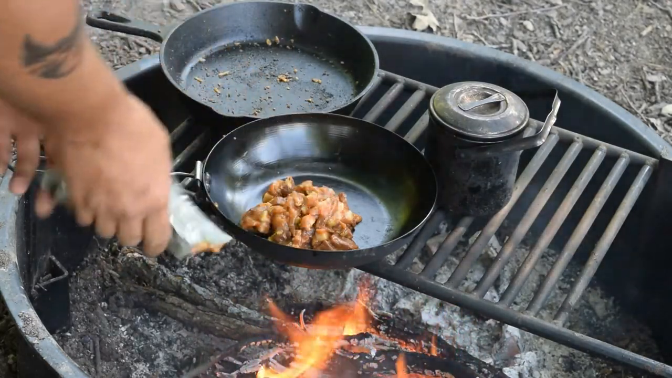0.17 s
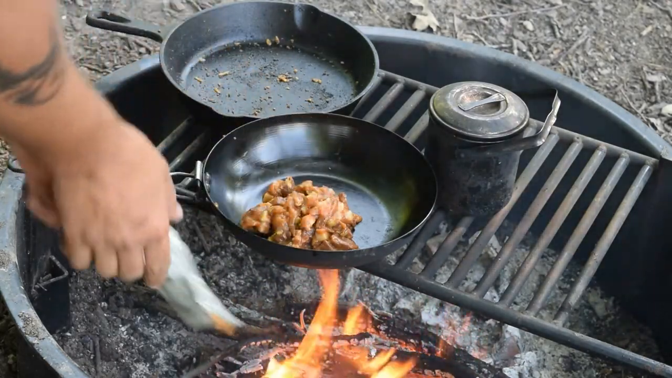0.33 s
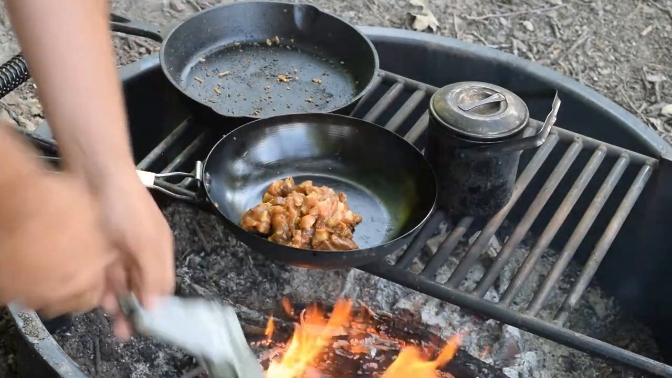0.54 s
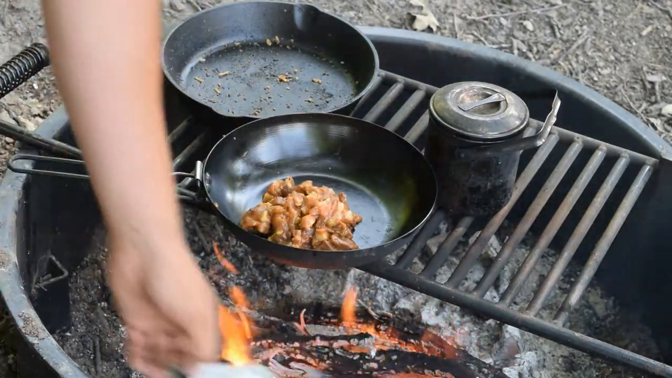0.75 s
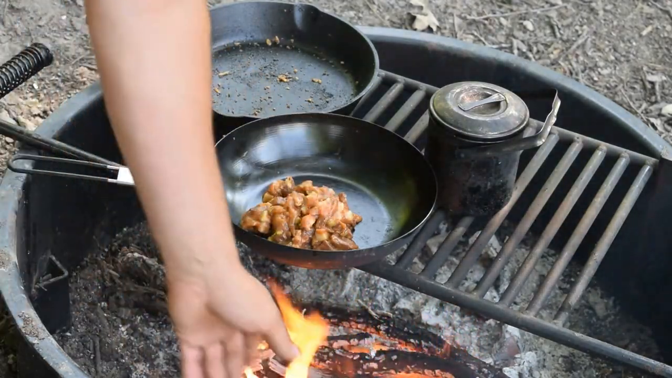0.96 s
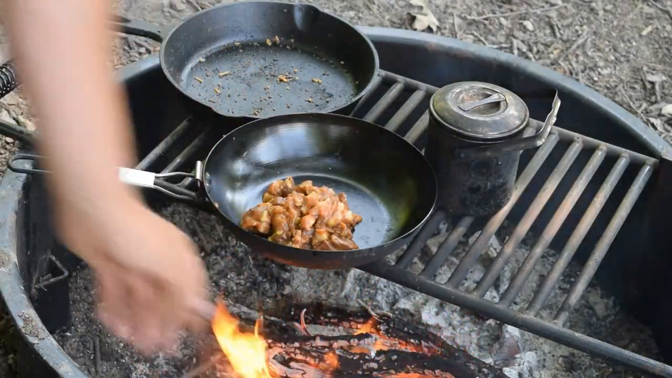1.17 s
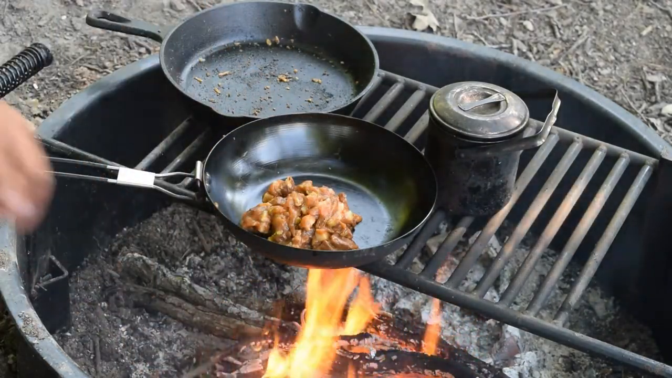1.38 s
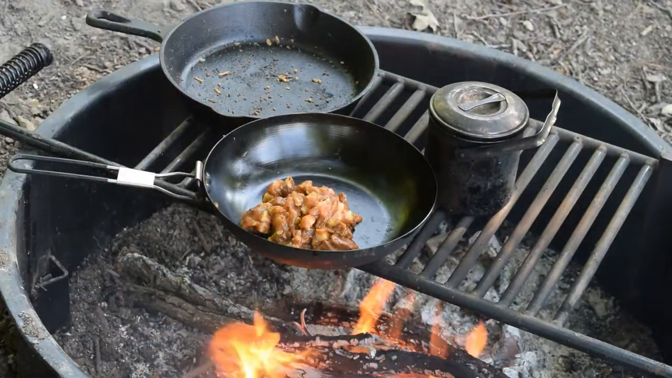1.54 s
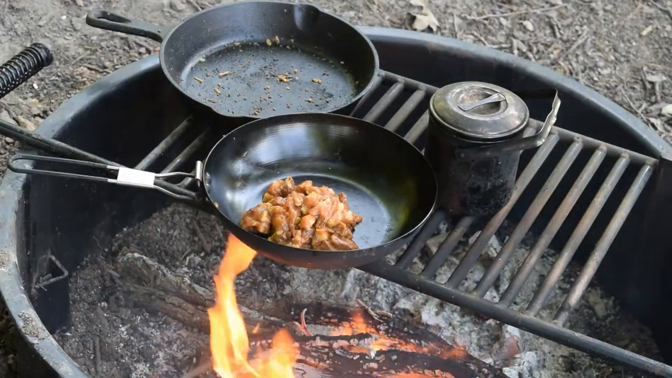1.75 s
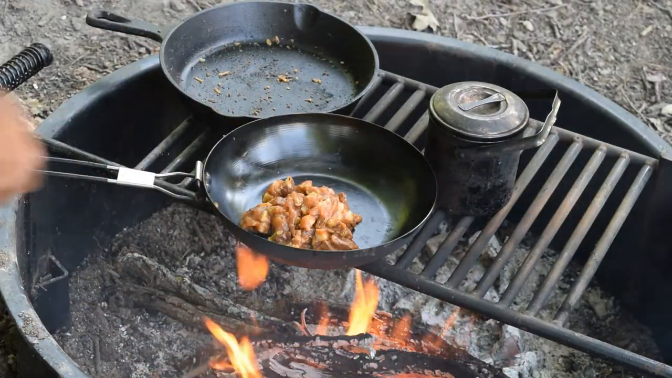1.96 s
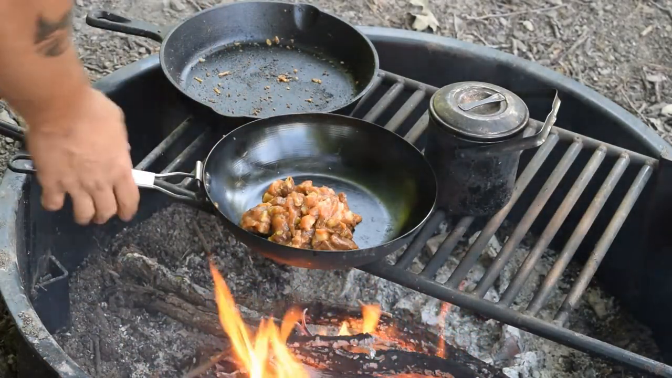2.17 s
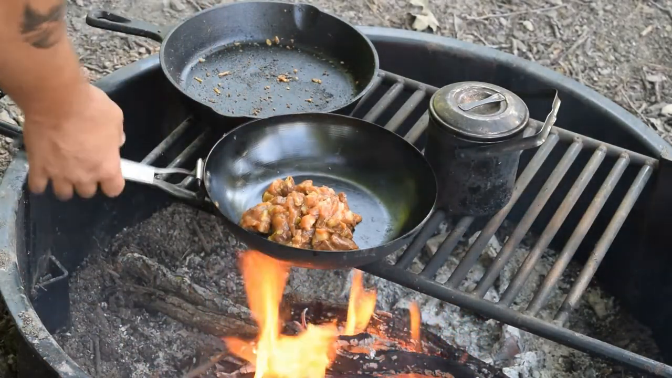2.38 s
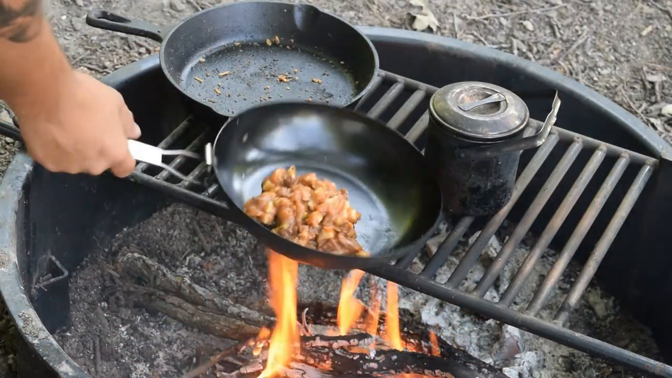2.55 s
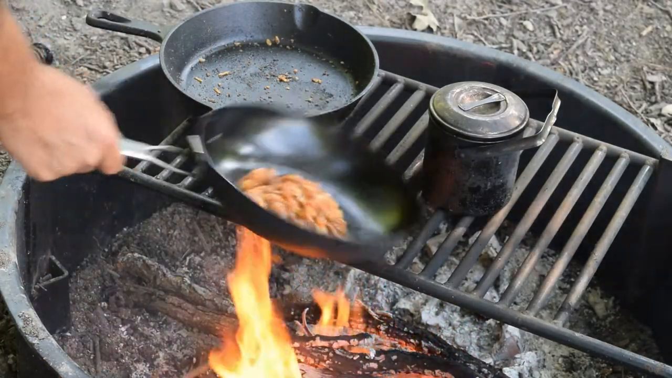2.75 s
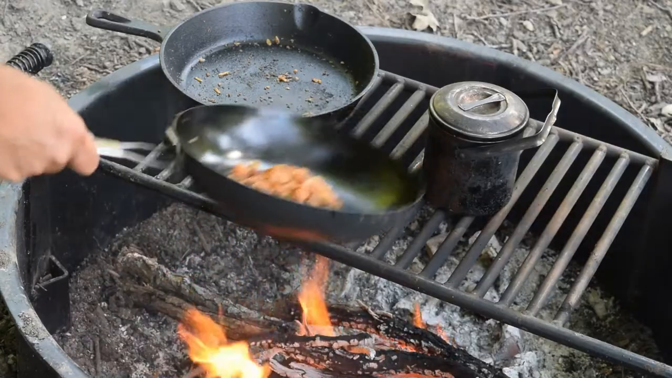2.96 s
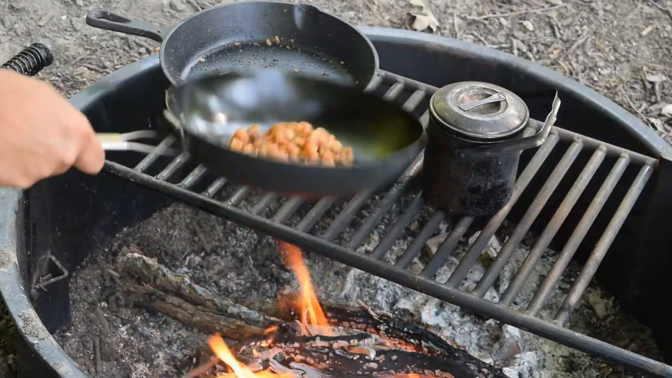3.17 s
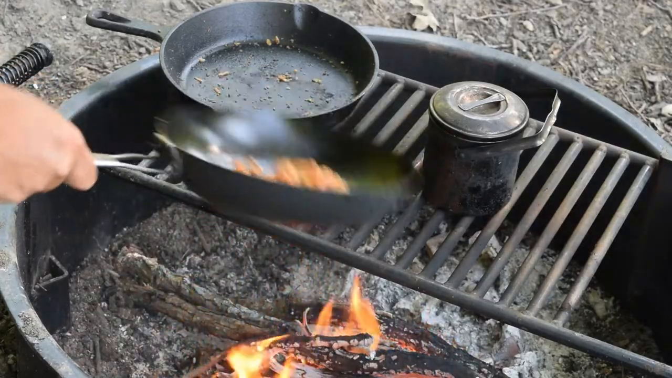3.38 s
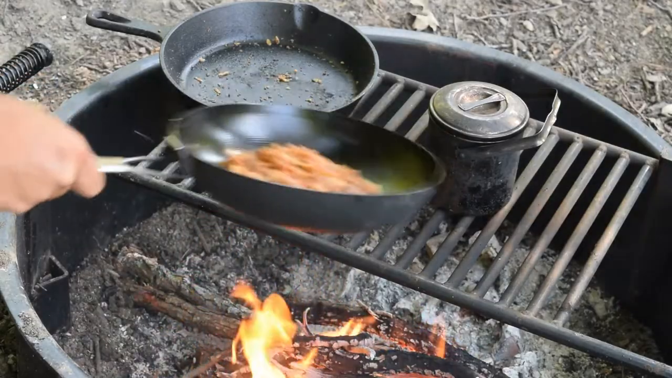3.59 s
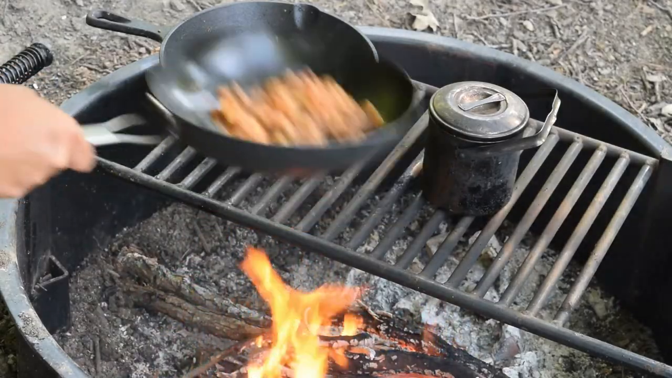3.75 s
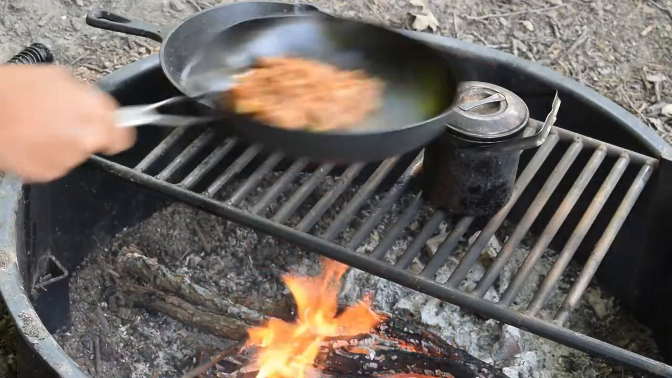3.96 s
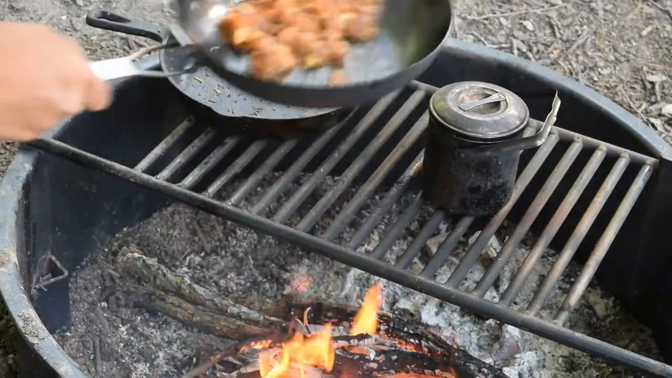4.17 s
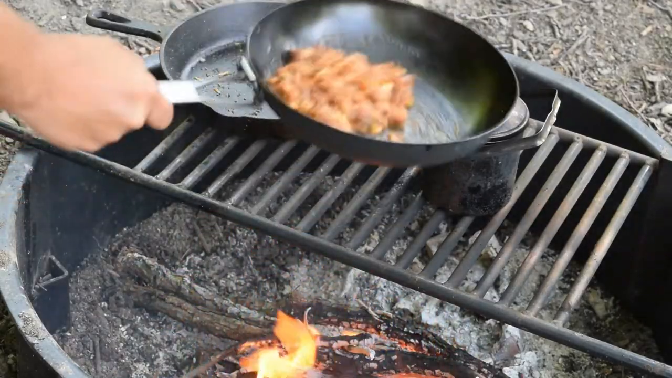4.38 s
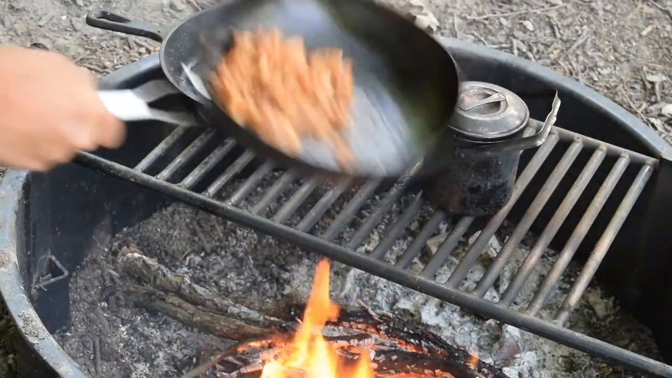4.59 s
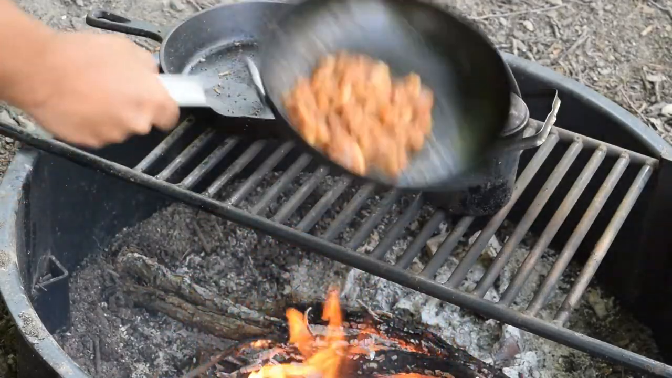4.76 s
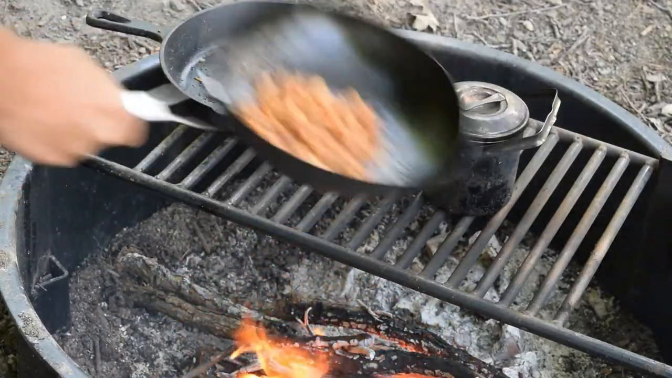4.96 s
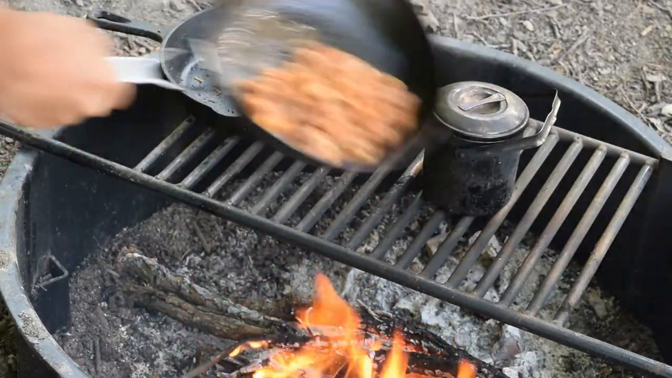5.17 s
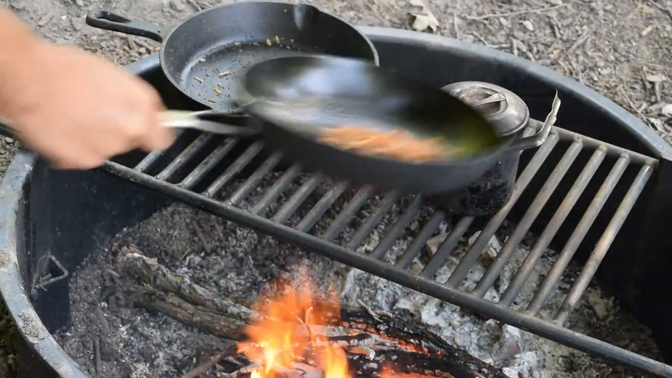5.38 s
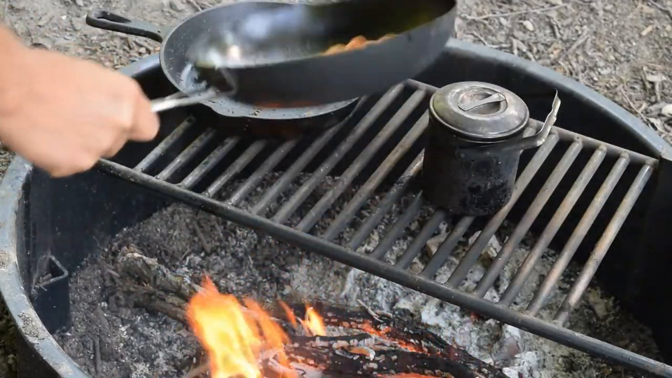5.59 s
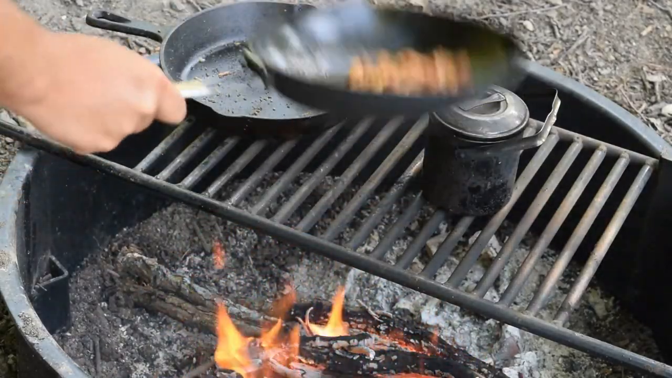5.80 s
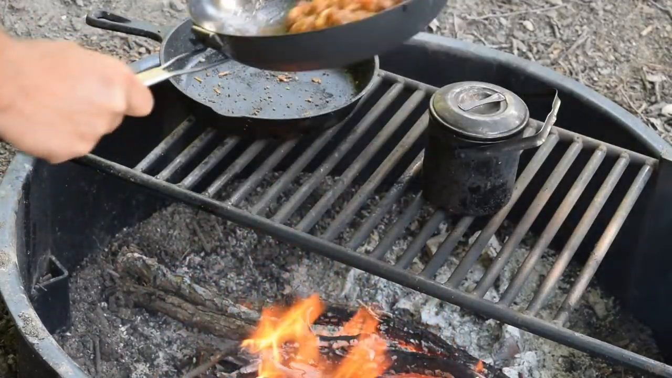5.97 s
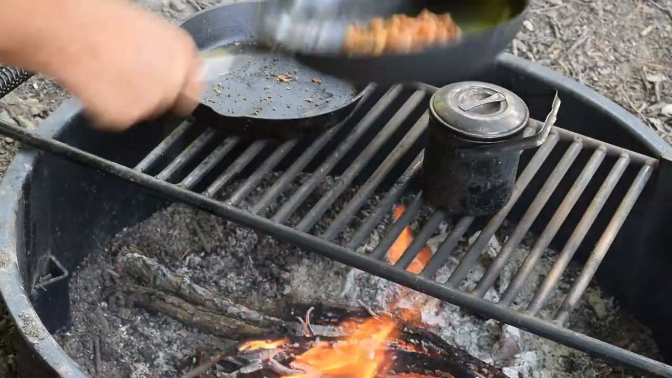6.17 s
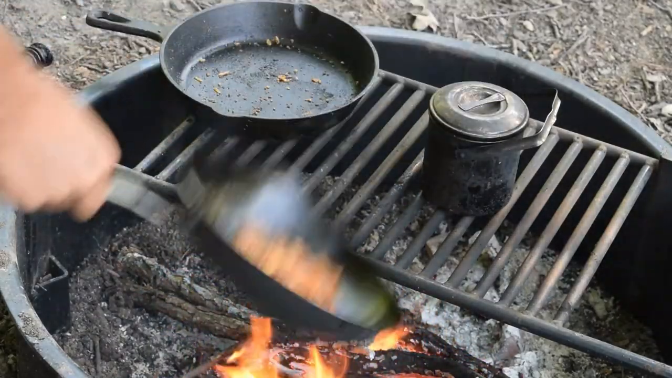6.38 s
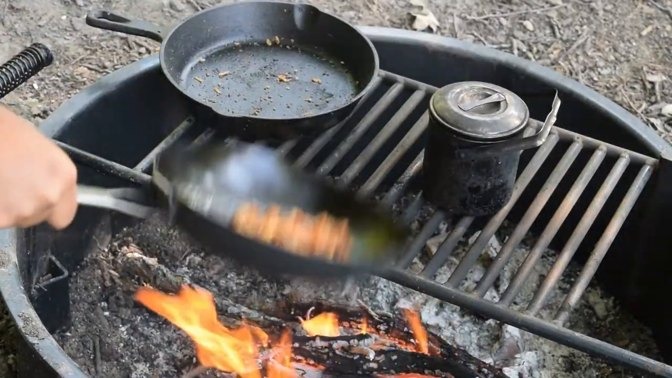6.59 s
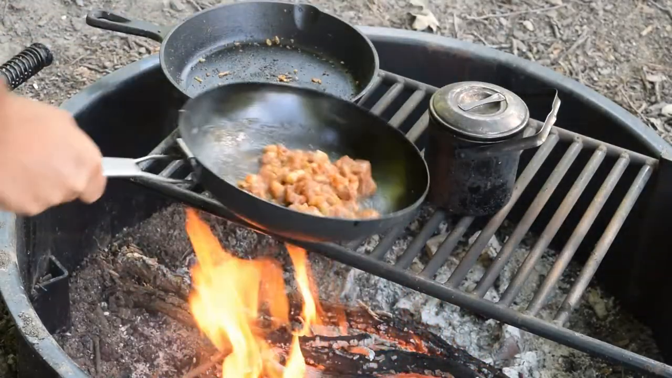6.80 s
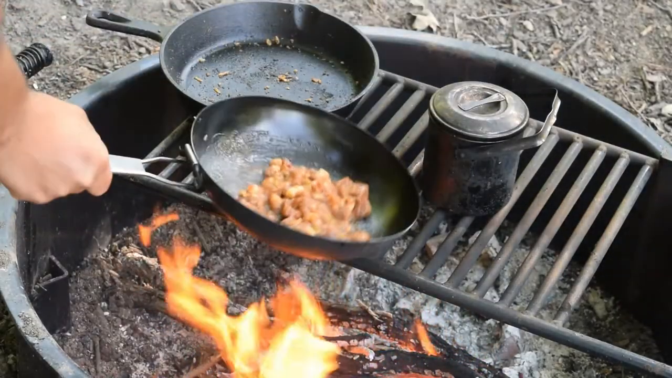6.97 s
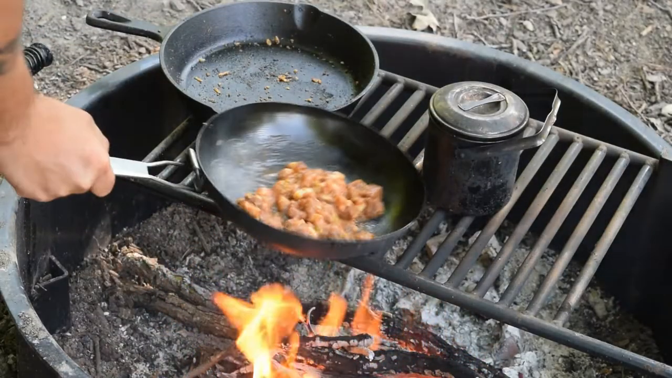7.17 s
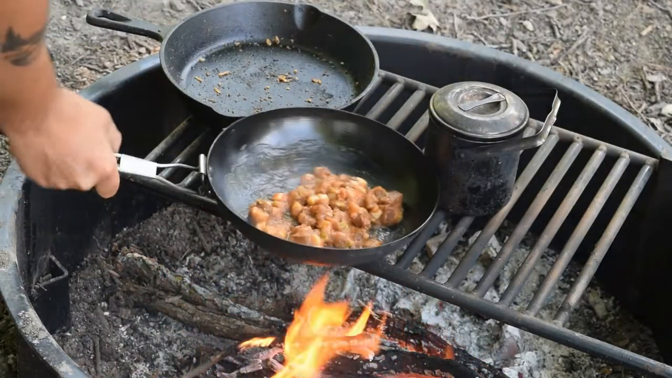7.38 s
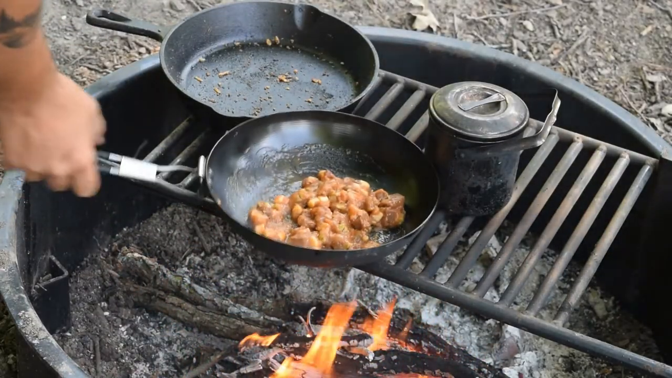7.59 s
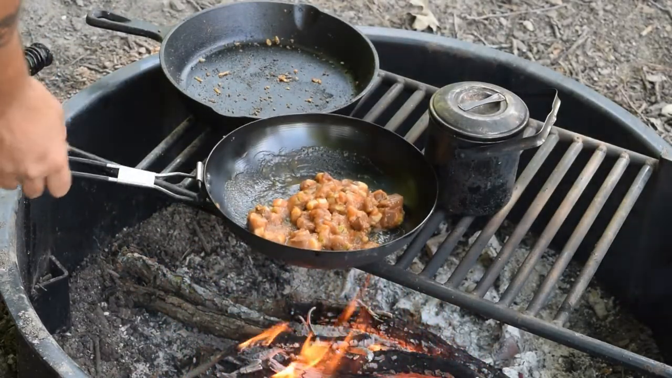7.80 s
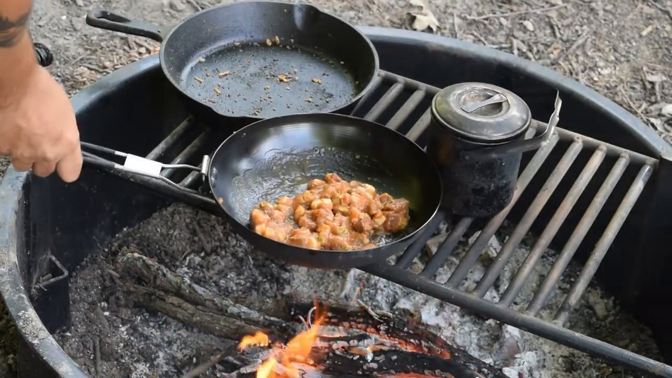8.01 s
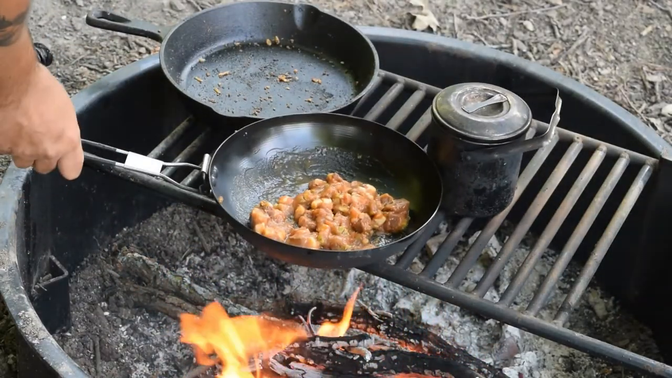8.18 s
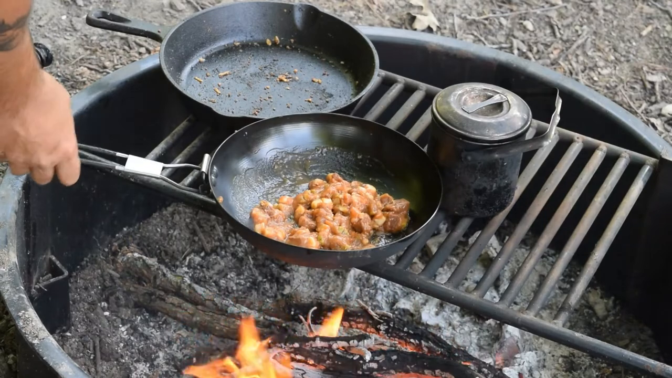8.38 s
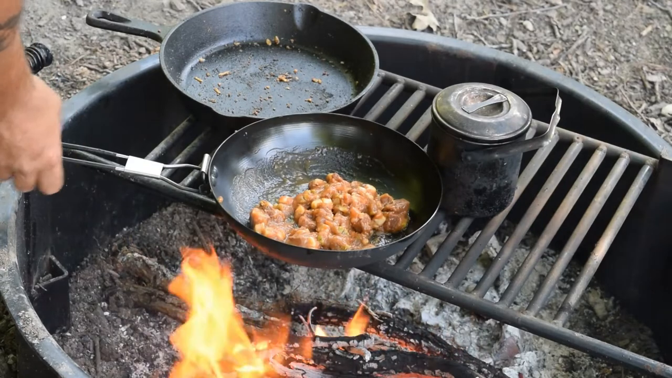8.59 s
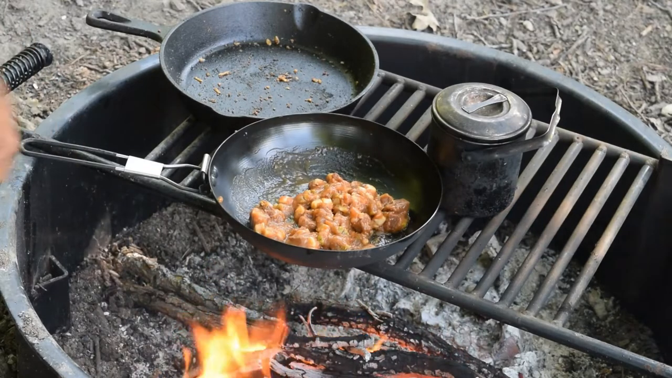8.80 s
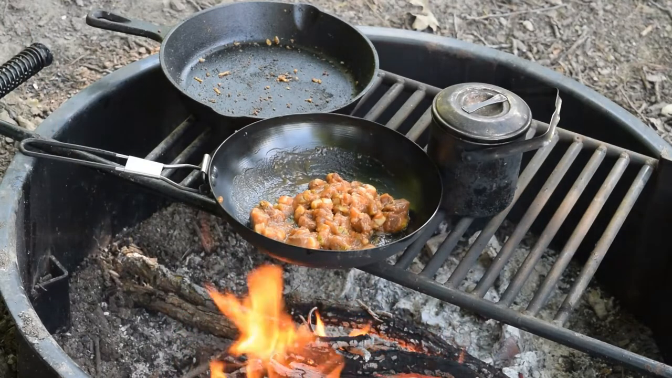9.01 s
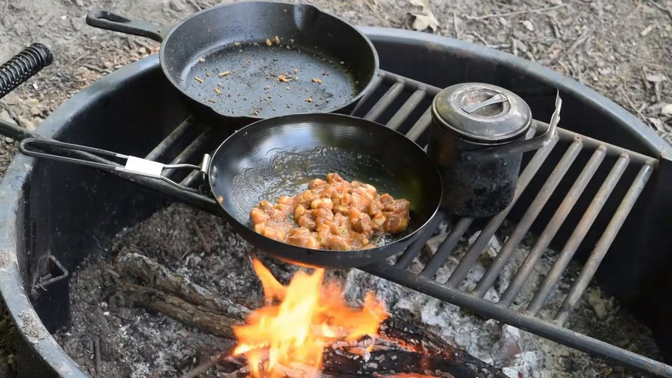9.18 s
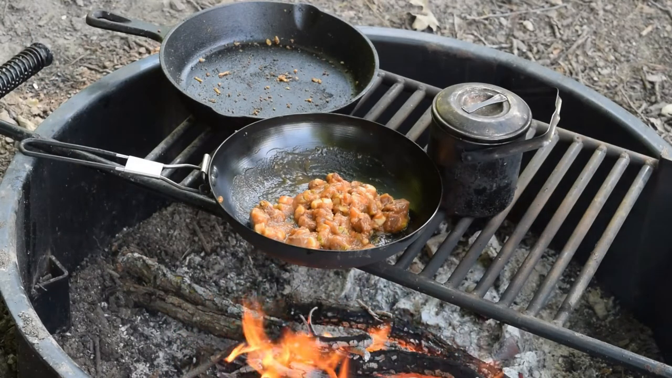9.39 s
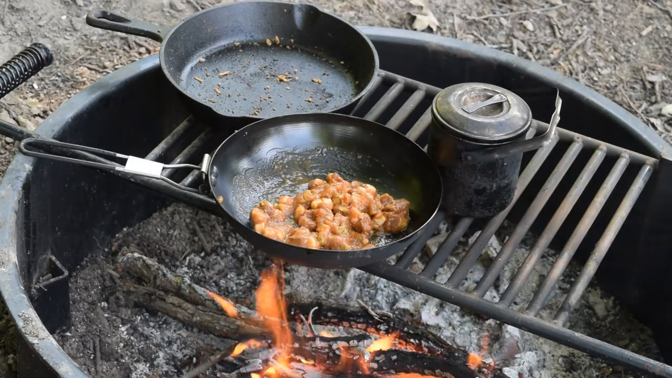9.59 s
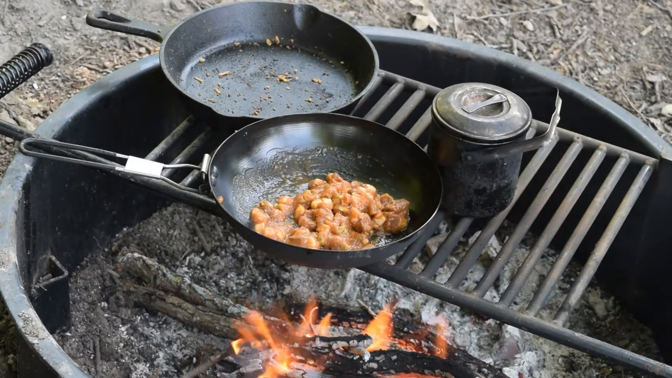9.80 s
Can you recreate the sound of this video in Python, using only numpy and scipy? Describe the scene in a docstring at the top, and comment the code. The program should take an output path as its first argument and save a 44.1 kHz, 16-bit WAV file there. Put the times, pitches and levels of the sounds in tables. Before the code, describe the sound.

A steel pan lifts from a fire grate, wet meat slides and sizzles, the pan clanks back down, and sharp fire pops continue.

```python
"""A faint sizzle of meat in a steel pan over a campfire, in open air, with small birds chipping far off.
The pan is lifted off the grate and swirled: steam bubbles hiss up as the meat slides onto hot metal.
Then it is set down with a clank, thuds and ringing modes of pan and grate, and rocks to rest.
Pockets of steam keep popping in wood and fat; low rumble, soft hiss and a far hum lie beneath.
Two close microphone ports take it all from nearly straight ahead."""
import sys
import numpy as np
from scipy import signal
from scipy.fft import rfft, irfft
from scipy.io import wavfile
from scipy.ndimage import uniform_filter1d

SR = 44100
rng = np.random.default_rng(int(sys.argv[2]) if len(sys.argv) > 2 else 0)


def wrap_up_sound(samples):
    """Save the sound to the file named by the first command line argument, as 16-bit audio."""
    columns = np.atleast_2d(samples).T
    # keep every value between -1 and 1, then stretch to whole-number steps
    tamed = np.clip(columns, -1, 1)
    steps = np.round(tamed * 32767).astype(np.int16)
    wavfile.write(sys.argv[1], SR, steps)


N = 434385
TIME, BINS = np.arange(N) / SR, np.fft.rfftfreq(N, 1 / SR)  # s, Hz
TAPS = 2048  # samples in a short pulse
TAP_HZ = np.fft.rfftfreq(TAPS, 1 / SR)

# colour of the open air and flames: frequency_hz, relative_level_db
AIR_COLOUR = [(12, -50), (20, -5), (60, -2.5), (113, -3.5), (138, -7.5), (328, -13.5), (367, -13),
              (459, -13), (590, -15), (642, -15), (2990, -22.5), (4540, -23.5), (10200, -30.5),
              (13500, -38.5), (16000, -35)]
AIR_DB, HUM_DB = -54.5, -71  # mean levels of the air and of the far low hum
# phrases of a far bird's chips: first_crest_s, last_crest_s, crest_hz, rising_share (0-1 of each note)
BIRD_PHRASES = [(0.05, .438, 4070, .4), (4.933, 5.432, 4700, .2)]
CHIP_GAP_S = 0.128  # approximate: a phrase holds a whole number of gaps
# thin far whistles: start_s, length_s, pitch_hz
BIRD_WHISTLES = [(0.327, 0.15, 4900), (8.126, .14, 6100), (8.936, 0.12, 4600), (9.66, .16, 4800)]

# the loudest pops of wood and fat: start_s, level_db, ring_hz, splintering (0-1)
LOUD_POPS = [(0.4041, -31, 14000, 0.05), (1.0331, -40, 2430, 0.6), (1.866, -38, 13500, 0.13),
             (2.6013, -43, 2870, 0.47), (2.752, -40, 7100, 0.23), (3.281, -41, 8550, .35),
             (3.295, -33.5, 8800, 0.18), (4.63, -36, 13500, 0.1), (4.664, -35.5, 1200, .2),
             (4.8145, -39, 4600, 0.19), (5.238, -34, 2900, 0.11), (5.537, -35, 7850, 0.18),
             (5.627, -39, 13000, 0.18), (5.991, -33.5, 4500, 0.13), (6.288, -44, 7700, 0.66),
             (6.334, -39, 7400, 0.27), (6.4017, -32.5, 3680, 0.19), (7.0982, -24.5, 4500, 0.06),
             (7.5427, -33, 8550, .1), (8.5133, -29, 3800, 0.09), (8.7365, -40, 3450, 0.24),
             (9.2573, -13.5, 300, 0.15), (9.559, -30.5, 7450, 0.09)]
# shared colour of pops and ember ticks: frequency_hz, relative_level_db
POP_COLOUR = [(60, 0), (250, -2), (600, 2), (2000, 1), (3300, 3), (4400, -1), (5300, -1), (7200, -5),
              (8400, -0.5), (10600, -20), (13000, -8.5), (16000, -38)]
POP_T60_S, SPLINTER_T60_S = 0.0098, 0.056  # a clean snap is short; splinters draw it out

# pan against grate: start_s, level_db, hardness_hz (top of the blow), pan_ring_db, grate_ring_db
PAN_KNOCKS = [(2.56, -35.5, 770, 4, -2), (2.6432, -26.5, 890, -3.5, -6.5), (7.065, -9, 2630, -3, -19),
              (7.1326, -21.5, 1480, -1, -17), (7.1799, -28, 2340, -1.5, -11), (7.2257, -37.5, 2400, 2, 2),
              (7.2635, -20.5, 1740, -3, 4.5), (7.665, -36, 834, 1, -4.5)]
# the dull blow itself: frequency_hz, relative_level_db
THUD_COLOUR = [(40, -31), (110, -18), (210, -5.5), (480, 1.5), (750, 0.5), (1000, -8.5), (1400, -4),
               (1900, -19.5), (4000, -18), (16000, -16)]
# echoes inside the steel fire ring: delay_s, relative_level_db
FIRE_RING_ECHOES = [(.0054, -13), (0.0129, -20)]
# ringing of the pan: pitch_hz, relative_level_db, t60_s
PAN_MODES = [(237, -60, .4), (483, -19, 0.25), (554, -28.5, 0.48), (629, -5.5, 0.034), (685, -39, 0.22),
             (920, -43, .25), (1074, -23, 0.3), (1146, -35.5, 0.91), (1230, -19, 0.14), (1380, -26, 0.14),
             (1619, -27, 0.28), (1920, -26, 0.2), (2230, -31, 0.32), (2265, -27, 0.26), (2340, -32.5, 0.36),
             (2450, -27, 0.24), (2710, -40, 0.23), (3010, -32, 0.14), (3440, -29, 0.24)]
# ringing of the grate: pitch_hz, relative_level_db, t60_s
GRATE_MODES = [(430, -30.5, 0.55), (518.7, -16, 0.32), (730, -25.5, 0.17), (867, -20.5, 0.11)]
# crowd of short-lived modes in pan, handle and fire ring: frequency_hz, relative_level_db
CLATTER_COLOUR = [(60, -30), (200, 4.5), (500, 1.5), (1200, 8.5), (1750, 2), (2300, -6.5), (3700, -0.5),
                  (5000, -8), (8500, -1), (11000, -26), (16000, -32)]
# decay of that crowd: frequency_hz, t60_s
CLATTER_DECAY = [(500, 0.3), (1200, 0.11), (1650, 0.16), (2400, 0.29), (4000, 0.16)]

# the pan shoves the meat onto fresh hot steel: start_s, length_s, frying_db, sliding_db
MEAT_SHOVES = [(3.177, .03, -69, -70), (3.267, .04, -55, -52.5), (3.372, 0.14, -55, -51),
               (3.47, 0.085, -49, -54.5), (3.586, 0.16, -48, -50.5), (3.75, 0.12, -46.5, -51),
               (4.06, 0.15, -53, -58), (5.05, 0.22, -64, -72), (6.69, .5, -63.5, -81)]
# colour of the frying bubbles: frequency_hz, relative_level_db
SIZZLE_COLOUR = [(880, -13), (1500, -3), (1850, -4.5), (2770, -5), (3350, -4), (4080, -5), (6560, -5.5),
                 (8570, -5.5), (10600, -18), (11900, -10), (13900, -10.5), (15100, -18), (16000, -14.5)]
# colour of the wet squelch: frequency_hz, relative_level_db
SLIDE_COLOUR = [(400, -16), (750, -11), (1050, -2.5), (1400, 1), (1800, -9.5), (2600, -7), (5000, -34)]
# colour of the fine fizz: frequency_hz, relative_level_db
FIZZ_COLOUR = [(5000, -33), (7400, -3.0), (8800, 1.0), (10000, -14), (16000, -22)]
SPATTER_HZ = (3500, 5000, 7500, 8600, 12500, 14000)  # one pitch_hz per droplet size
# the hiss builds during a shove, drops when it ends, and lingers while the wet side dries (time constants)
FRY_RISE_S, FRY_FALL_S, LINGER_DB, LINGER_S = 0.025, 0.2, -19.5, 2.4
SLIDE_RISE_S, SLIDE_FALL_S = 0.022, 0.056
SEARED_DB, TURNED_DB = -72.5, -66.5  # quiet frying before and after the meat is turned
# fizz relative to the frying, and its extra around the first touch of dry steel
FIZZ_DB, DRY_STEEL_DB, COATING_S = -10.5, 18.5, 0.19

# colour of the microphone's self-noise: frequency_hz, relative_level_db
SELF_NOISE_COLOUR = [(30, -56), (150, 1.5), (1000, -4), (4000, -12), (8500, -2.5), (15000, -6.5)]
EDGE_HZ = 15850  # upper band edge of the recorder


def amp(db):
    """Decibels to gain."""
    return 10 ** (np.asarray(db) / 20)


def unit(x):
    """Scales to rms 1."""
    return x / np.sqrt(np.mean(x ** 2) + 1e-20)


def spectrum(points, hz):
    """Reads a table on a log-frequency axis."""
    f, value = np.transpose(points)
    return np.interp(np.log(hz + 1), np.log(f + 1), value)


def add(mix, s, sound):
    """Mixes a sound in at time s."""
    part = mix[max(round(s * SR), 0):][:len(sound)]
    part += sound[:len(part)]


def tinted(x, colour):
    """Gives a full-length signal a spectrum, at rms 1."""
    return unit(irfft(rfft(x) * amp(spectrum(colour, BINS)), N))


def drift(rate_hz):
    """Slow random motion of rms 1."""
    return unit(irfft(rfft(rng.standard_normal(N)) * np.exp(-(BINS / rate_hz) ** 2), N))


def click(db):
    """The sharpest causal (minimum-phase) pulse with this spectrum, peak 1."""
    both_sides_db = np.r_[db, db[-2:0:-1]]
    log_gain = np.log(amp(both_sides_db) + 1e-5)
    pulse = np.fft.ifft(np.exp(np.conj(signal.hilbert(log_gain)))).real
    return pulse / abs(pulse).max()


def grains(per_s, spread_db):
    """Random tiny bursts, most of them small and a few large."""
    size = amp(spread_db * np.minimum(rng.exponential(1, N), 4))
    happens = rng.random(N) < per_s / SR
    return size * rng.choice([-1, 1], N) * happens


def outdoors(swell_db=0.63, hum_hz=111, hum_waver=0.0342, hum_swell_db=1.5):
    """Low rumble and soft hiss of open air and flames: swelling noise, with a wavering hum."""
    air = tinted(rng.standard_normal(N), AIR_COLOUR) * amp(AIR_DB + swell_db * drift(5.6))
    pitch_hz = hum_hz * (1 + hum_waver * drift(10.7))
    hum = unit(np.sin(2 * np.pi * np.cumsum(pitch_hz) / SR))
    return air + hum * amp(HUM_DB + hum_swell_db * drift(1.3))


def note(hz):
    """A thin whistled note: one sine that follows a pitch curve under a rounded envelope."""
    return np.hanning(len(hz)) ** .5 * np.sin(2 * np.pi * np.cumsum(hz) / SR)


def birds(chip_db=-58.5, chip_s=0.033, sweep_hz_per_s=70000, whistle_db=-65, waver=0.0043):
    """Far off, evenly spaced chips dart up to a crest and down; another bird holds thin whistles."""
    out, t = np.zeros(N), np.arange(0, chip_s, 1 / SR)
    for first, last, crest_hz, rise in BIRD_PHRASES:
        crest_s = rise * chip_s
        chip = amp(chip_db) * note(crest_hz - sweep_hz_per_s * abs(t - crest_s))
        count = round((last - first) / CHIP_GAP_S) + 1
        for s in np.linspace(first, last, count):
            add(out, s - crest_s, chip)
    wobble = 1 + waver * drift(80)
    for s, length, hz in BIRD_WHISTLES:
        held = (TIME >= s) & (TIME < s + length)
        add(out, s, amp(whistle_db) * note(hz * wobble[held]))
    return out


def embers(db=-72, spray=0.12, spray_s=0.0032):
    """Faint scattered ticks from the burning logs: each a break with a brief spray of noise."""
    t = np.arange(TAPS) / SR
    tick = signal.unit_impulse(TAPS) + spray * rng.standard_normal(TAPS) * np.exp(-t / spray_s)
    ticks = signal.oaconvolve(grains(per_s=22, spread_db=2.5), tick)[:N]
    return amp(db) * tinted(ticks, POP_COLOUR)


def snap(t60, splinter):
    """One sharp break and a dying spray of splinters, even in colour."""
    t = np.arange(TAPS * 2) / SR
    burst = splinter * rng.standard_normal(len(t)) * 1e-3 ** (t / t60)
    burst[0] = 1
    # a break is broadband: smooth out the broad humps of the spray and keep its energy
    power = uniform_filter1d(abs(rfft(burst)) ** 2, size=50)
    even = signal.fftconvolve(burst, click(-10 * np.log10(power)))
    return even * np.linalg.norm(burst) / np.linalg.norm(even)


def pops(ring_db=7, ring_octaves=0.12, tilt_db=5.0, small_hz=7000):
    """Pockets of steam burst in wood and fat: a snap coloured by the size of its pocket."""
    out = np.zeros(N)
    for s, db, hz, splinter in LOUD_POPS:
        # a large pocket snaps across the band; a small one rings high and sounds thin
        small = min(hz / small_hz, 1)
        octaves = np.log2((TAP_HZ + 1) / hz)
        resonance = np.sqrt(small) * ring_db * np.exp(-(octaves / ring_octaves) ** 2)
        tilt = small ** 2 * tilt_db * octaves
        colour = spectrum(POP_COLOUR, TAP_HZ) + (resonance + tilt)
        burst = snap(POP_T60_S + SPLINTER_T60_S * splinter, splinter)
        add(out, s, amp(db) * signal.fftconvolve(burst, click(colour)))
    return out


def softened(hz, top_hz, leak_db=-24):
    """A soft contact gives little above top_hz; grit lets a trace through."""
    return 1 / np.sqrt(1 + (hz / top_hz) ** 6) + amp(leak_db)


def ring(modes, t, top_hz, spot_db=1.0):
    """Dying modes; each blow lands on a different spot and weights them anew."""
    hz, db, t60 = np.transpose(modes)[:, :, None]
    weight = amp(db + spot_db * rng.uniform(-1, 1, hz.shape)) * softened(hz, top_hz)
    tone = np.sin(2 * np.pi * (hz * t + rng.random(hz.shape)))
    return (weight * amp(-60 * t / t60) * tone).sum(0)


def clatter(t, top_hz):
    """Many close modes merge into a noise whose bands each die at their own rate."""
    hz, s, z = signal.stft(rng.standard_normal(len(t)), SR, nperseg=256)
    fall = amp(-60 * s / spectrum(CLATTER_DECAY, hz)[:, None])
    colour = amp(spectrum(CLATTER_COLOUR, hz)) * softened(hz, top_hz)
    return signal.istft(z * fall * colour[:, None], SR, nperseg=256)[1][:len(t)]


def knocks(clatter_db=-9, build_s=0.00095, dispersion_hz=1500):
    """Pan meets grate: each blow is a thud with echoes, then pan and grate ring on."""
    out, t = np.zeros(N), np.arange(SR // 2) / SR
    r = np.exp(-2 * np.pi * dispersion_hz / SR)
    for s, db, top_hz, pan_db, grate_db in PAN_KNOCKS:
        colour = spectrum(THUD_COLOUR, TAP_HZ) + 20 * np.log10(softened(TAP_HZ, top_hz))
        thud = amp(db) * click(colour)
        thud = signal.lfilter([-r, 1], [1, -r], thud)  # in sheet steel the treble runs ahead of the bass
        add(out, s, thud)
        for delay, echo_db in FIRE_RING_ECHOES:
            add(out, s + delay, -amp(echo_db) * thud)
        pan = ring(PAN_MODES, t, top_hz) + amp(clatter_db) * clatter(t, top_hz)
        metal = amp(pan_db) * pan + amp(grate_db) * ring(GRATE_MODES, t, top_hz)
        spreading = 1 - np.exp(-t / build_s)  # the ringing spreads through the metal
        add(out, s, amp(db) * metal * spreading)
    return out


def shove(start, length, rise_s, fall_s):
    """Builds up while the meat moves and dies away once it stops."""
    t = np.maximum(TIME - start, 0)
    build = 1 - np.exp(-np.minimum(t, length) / rise_s)
    return build * np.exp(-np.maximum(t - length, 0) / fall_s)


def frying():
    """How hard the meat fries: a quiet base, and a flash of steam that lingers after every shove."""
    power = amp(np.where(TIME < MEAT_SHOVES[0][0], SEARED_DB, TURNED_DB)) ** 2
    for start, length, db, _ in MEAT_SHOVES:
        flash = shove(start, length, FRY_RISE_S, FRY_FALL_S)
        linger = amp(LINGER_DB) * shove(start, length, FRY_RISE_S, LINGER_S)
        power = power + amp(db) ** 2 * (flash ** 2 + linger ** 2)
    return np.sqrt(power)


def sliding():
    """How much wet meat is moving over the steel: the shoves add up in power."""
    power = np.zeros(N)
    for start, length, _, db in MEAT_SHOVES:
        power += (amp(db) * shove(start, length, SLIDE_RISE_S, SLIDE_FALL_S)) ** 2
    return np.sqrt(power)


def spatter(heat, db=-33, follow=0.59, per_s=14, spread_db=6.5, ring_db=9, spray=0.35, spray_s=0.0011):
    """Single droplets of fat spit above the hiss, each size with its own pitch."""
    out, t = np.zeros(N), np.arange(TAPS) / SR
    for hz in SPATTER_HZ:
        octaves = np.log2((TAP_HZ + 1) / hz)
        colour = spectrum(SIZZLE_COLOUR, TAP_HZ) + ring_db * np.exp(-octaves ** 2 * 10)
        burst = signal.unit_impulse(TAPS) + spray * rng.standard_normal(TAPS) * np.exp(-t / spray_s)
        droplet = signal.fftconvolve(burst, click(colour))
        out += signal.oaconvolve(grains(per_s, spread_db), droplet)[:N]
    return amp(db) * unit(out) * heat ** follow  # spitting changes less than the frying does


def sizzle(heat, sputter_db=1.53, squelch_db=1.7):
    """Tiny steam bubbles burst in clumps; larger wet ones squelch as the meat slides."""
    clumps = amp(sputter_db * drift(45))
    fry = tinted(grains(per_s=5500, spread_db=2.5), SIZZLE_COLOUR)
    # the fizz swells into the first shove, then fades as fat coats the dry steel
    dry_steel = np.exp(-abs(TIME - MEAT_SHOVES[0][0]) / COATING_S)
    fizz = tinted(grains(per_s=1500, spread_db=3.0), FIZZ_COLOUR) * amp(FIZZ_DB + DRY_STEEL_DB * dry_steel)
    wet = tinted(grains(per_s=1500, spread_db=1.5), SLIDE_COLOUR) * amp(squelch_db * drift(30))
    return heat * clumps * (fry + fizz) + wet * sliding()


def scene(port_lag_s=2e-6, self_noise_db=-75):
    """All lies nearly straight ahead of two close microphone ports, with self-noise opposed between them."""
    heat = frying()
    mid = outdoors() + birds() + embers() + pops() + knocks() + spatter(heat) + sizzle(heat)
    # the tiny difference in path opens a side signal that grows with frequency
    side = irfft(2j * np.pi * BINS * port_lag_s * rfft(mid), N)
    side += amp(self_noise_db) * tinted(rng.standard_normal(N), SELF_NOISE_COLOUR)
    return np.array([mid + side, mid - side])


def record(dry):
    """The recorder's band limit: a steep low-pass at EDGE_HZ."""
    low_pass = signal.firwin(511, EDGE_HZ, window=("kaiser", 9), fs=SR)
    return signal.oaconvolve(dry, low_pass[None], "same")


dry = scene()
out = record(dry)
wrap_up_sound(out)
```